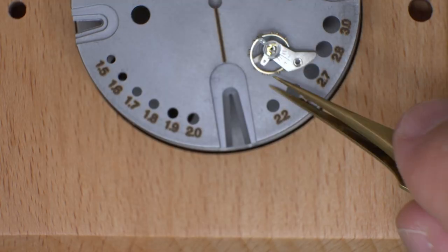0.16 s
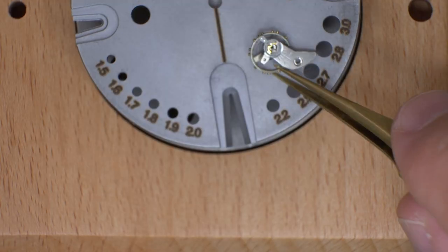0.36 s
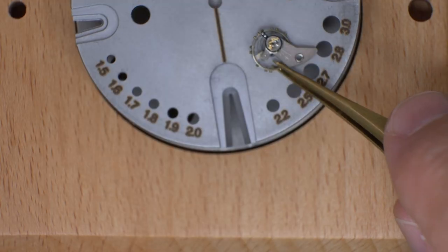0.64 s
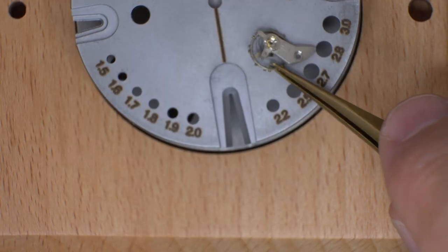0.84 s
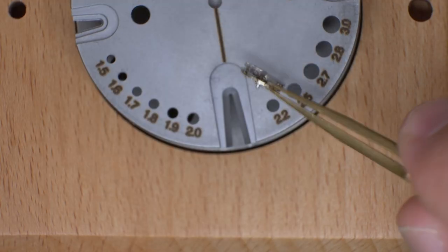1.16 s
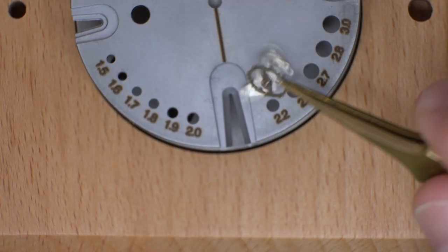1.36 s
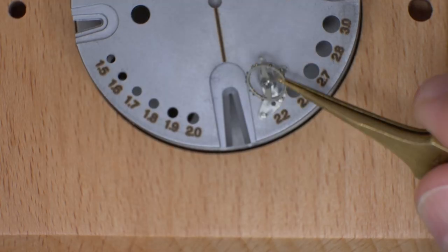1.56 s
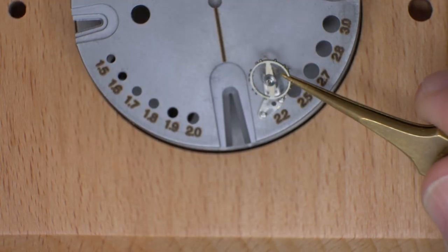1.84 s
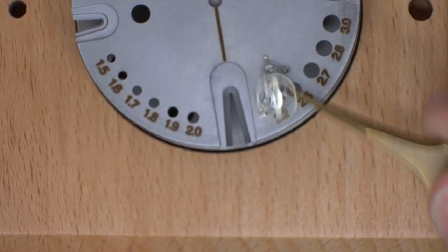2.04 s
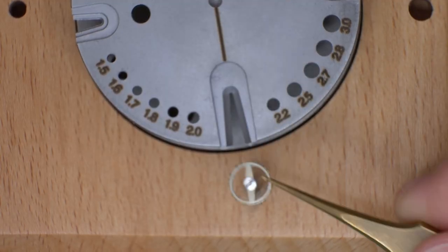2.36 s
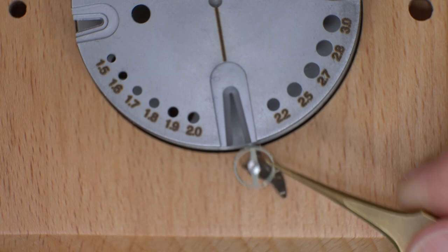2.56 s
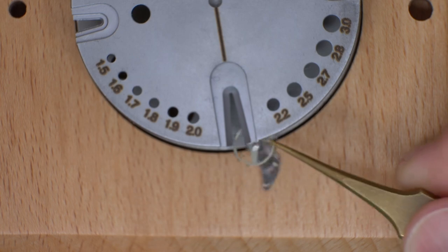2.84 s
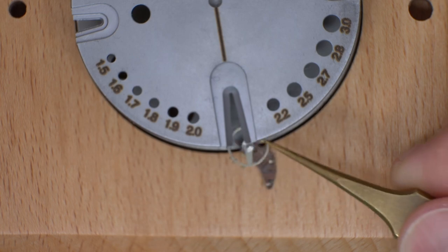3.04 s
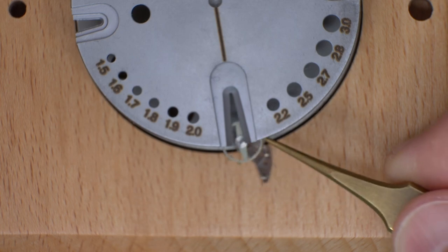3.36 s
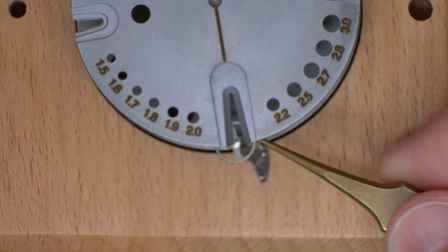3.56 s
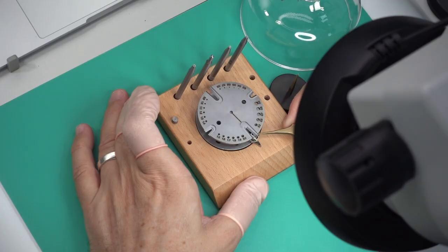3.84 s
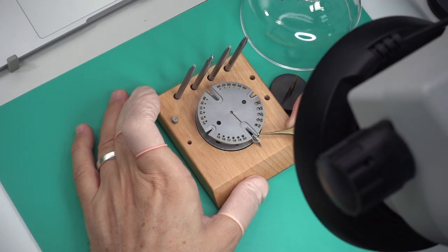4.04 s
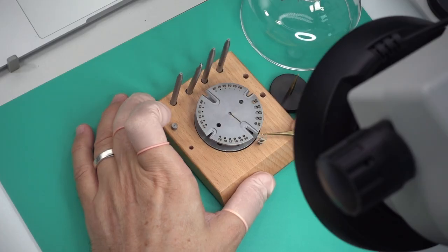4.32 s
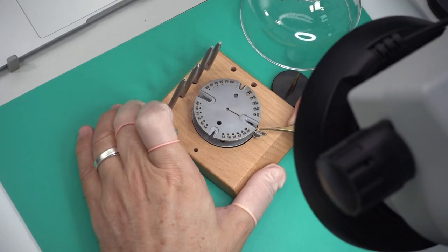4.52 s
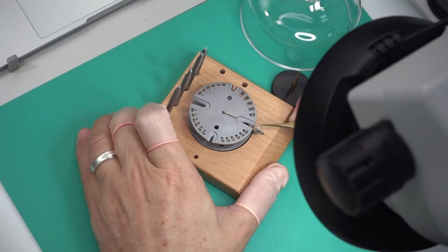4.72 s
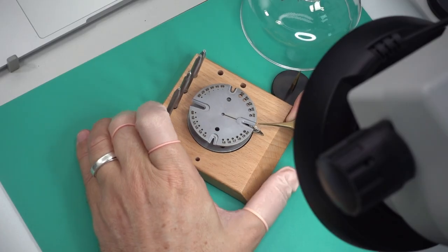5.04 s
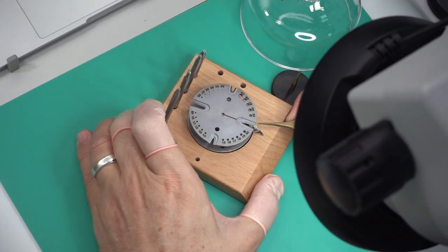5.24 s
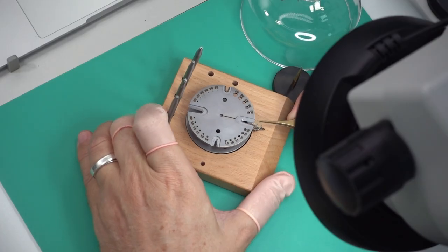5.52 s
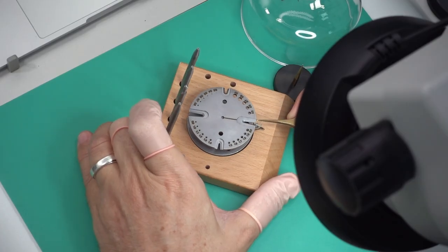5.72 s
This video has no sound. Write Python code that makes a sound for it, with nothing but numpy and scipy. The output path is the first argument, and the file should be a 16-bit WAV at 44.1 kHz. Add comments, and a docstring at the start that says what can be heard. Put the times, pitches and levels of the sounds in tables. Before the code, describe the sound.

Sparse, very fine metal chinks come first, then brighter clinks and a dense crackling run of ticks as tweezers drag a small part over steel. After a lull, a hand slides and turns a wooden block on a mat: soft scuffs, dull thumps, one broad crack, tiny loose-pin clicks and a closing knock. Steady low hum, soft hiss and faint high twitter; one close indoor microphone.

```python
"""Brass tweezers move a tiny watch part about on a steel plate, then a hand turns the wooden block under it on a mat.
Each contact is a sharp click with a little scatter; the blades, part, plate and block ring on at their own modes.
Dense tiny slips make the slides, scrapes and rattles; shaped noise makes a low rumble and soft pitched bumps.
Behind lie a quiet workroom's hum lines and hiss, and a faint high twitter of short blips, all at one microphone."""
import sys
import numpy as np
from scipy import signal
from scipy.fft import rfft, irfft
from scipy.io import wavfile
from scipy.ndimage import uniform_filter1d

SR = 44100
rng = np.random.default_rng(int(sys.argv[2]) if len(sys.argv) > 2 else 0)


def linear_from_db(decibels):
    """Turn decibels (scalar or array-like) into linear amplitude factors; 0 gives 1."""
    return 10 ** (np.asarray(decibels, float) / 20)


def to_wav(sig):
    """Store sig (one row per channel, or 1-D mono) as 16-bit WAV at the path in sys.argv[1].

    Samples outside -1..1 are clipped; the rate is SR.
    """
    pcm = np.clip(np.atleast_2d(sig), -1, 1) * 32767
    pcm = np.round(pcm).astype(np.int16)
    wavfile.write(sys.argv[1], SR, pcm.T)  # frames by channels


N = 259308

# What struck or rubbed steel sings. Each row: centre in Hz, width in Hz, relative level in dB.
STEEL_SONG = [(3160, 770, -5), (4400, 900, -4), (5300, 790, -2)]
# Loose pins in the block. One row: centre in Hz, width in Hz.
PIN_RESONANCE = (4280, 1450)
# The part struck and left chattering. Each row: start in seconds, seconds until damped,
# level of the low modes in dB, level of the top mode in dB.
PART_BLOWS = [(.237, 0.0028, -63.5, -90), (.274, .003, -73, -90), (1.283, .004, -66, -81),
              (1.405, 0.038, -79, -62), (1.44, .066, -77, -85), (1.506, 0.052, -65, -57),
              (1.554, 0.045, -65, -71), (1.617, 0.03, -67, -85), (2.213, .1, -70, -68),
              (2.372, .03, -84, -59), (2.402, .05, -81, -58)]


def evened(x):
    """Scales to rms 1."""
    return x / np.sqrt(np.mean(x ** 2) + 1e-20)


def peaked(x):
    """Scales so that the first 40 samples peak at 1."""
    return x / abs(x[:40]).max()


def read(points, hz):
    """Reads a spectrum on a log-frequency axis."""
    f, value = np.transpose(points)
    return np.interp(np.log(hz + 1), np.log(f + 1), value)


def add(mix, s, sound):
    """Adds a sound at time s, cut off where the mix ends."""
    stretch = mix[round(s * SR):][:len(sound)]
    stretch += sound[:len(stretch)]


def coloured(x, points):
    """Filters x by the spectrum in points, then scales to rms 1."""
    gain = linear_from_db(read(points, np.fft.rfftfreq(len(x), 1 / SR)))
    return evened(irfft(rfft(x) * gain, len(x)))


def resonate(x, hz, width_hz):
    """One two-pole resonance."""
    r = np.exp(-np.pi * width_hz / SR)
    return signal.lfilter([1, 0, -1], [1, -2 * r * np.cos(2 * np.pi * hz / SR), r * r], x)


def resonate_twice(x, hz, width_hz):
    """Two equal resonances in a row, with steeper skirts."""
    return resonate(resonate(x, hz, width_hz), hz, width_hz)


def slow(rate_hz):
    """Smooth chance of rms about 1 that changes about rate_hz times a second."""
    knots = rng.standard_normal(400)
    return np.interp(np.arange(N) / SR * rate_hz, np.arange(400), knots) * np.sqrt(1.5)


def room(air_db=-54.5):
    """Steady air noise, with narrow noise bands and sines of drifting pitch."""
    # Room air and microphone hiss. Each row: frequency in Hz, relative level in dB per Hz.
    air = [(12, -37), (25, -21.5), (63, -13.5), (110, -3.5), (250, -11.5), (420, -20.5), (470, -21),
           (1050, -26), (2000, -35), (4000, -41), (7600, -40), (8600, -37.5), (11000, -38), (16000, -36)]
    # Hum lines of the room, and narrow hiss around the twitter's pitches.
    # Each row: frequency in Hz, rms level in dB, width in Hz.
    lines = [(38.5, -68, 11), (59.5, -65, 1.4), (119.9, -53, 0.63), (198.2, -63, 12.4), (235.8, -67, 8.1),
             (369.2, -71, 19.7), (407.7, -74.5, 6), (548.5, -80, 3.9), (636, -85, 9.2), (940, -79, 1.516),
             (12400, -89.5, 2), (1770, -84.5, 27), (8570, -79.5, 190), (9170, -84.5, 400),
             (9250, -86.5, 350)]
    out = linear_from_db(air_db) * coloured(rng.standard_normal(N), air)
    t = np.arange(N) / SR
    for hz, db, width_hz in lines:
        if width_hz > 3:
            out += linear_from_db(db) * evened(resonate_twice(rng.standard_normal(N), hz, width_hz))
        else:
            drift = np.cumsum(width_hz * slow(rate_hz=3.956)) / SR  # in turns
            out += linear_from_db(db) * np.sqrt(2) * np.sin(2 * np.pi * (hz * t + drift + rng.random()))
    return out


def twitter(beat_s=1 / 50, blip_s=0.013, spread_db=4, clump_db=3, jitter_s=0.0045, wander_hz=110):
    """Short blips around three pitches on a loose steady beat, uneven in size and swelling in clumps."""
    # Each row: middle pitch in Hz, level in dB before the chance in size, first beat in seconds,
    # drop of every second blip in dB (negative makes it louder).
    pitches = [(8770, -70.5, 0.028, 3), (9150, -68, 0.042, 12), (9600, -70, .0293, -2.5)]
    out, t = np.zeros(N), np.arange(round(blip_s * SR)) / SR
    beats = np.arange(round(N / SR / beat_s))
    for hz, db, first_s, weak_db in pitches:
        clump = slow(rate_hz=4.6)
        for k, (late, size, pitch) in zip(beats, rng.standard_normal((len(beats), 3))):
            s = abs(first_s + k * beat_s + jitter_s * late)
            mood_db = clump_db * clump[min(round(s * SR), N - 1)]
            size_db = spread_db * min(size, 1)  # many small, none huge
            blip = np.hanning(len(t)) * np.sin(2 * np.pi * (hz + wander_hz * pitch) * t)
            add(out, s, linear_from_db(db - weak_db * (k % 2) + size_db + mood_db) * blip)
    return np.roll(out, -len(t) // 2)  # centres the blips on their times


def low_rumble():
    """Low rumble, uneven in level, in separate spells."""
    # Level of the rumble, spell by spell.
    # Each row of a spell: time in seconds, level in dB before a short smoothing.
    spells = [
        [(1.9, -61), (1.97, -75), (2.012, -51), (2.156, -48.5), (2.18, -58.5), (2.394, -54.5), (2.44, -51)],
        [(2.44, -69), (2.47, -51.5), (2.734, -52.5), (2.85, -57), (2.86, -78), (2.886, -55), (3.2, -58)],
        [(4.0, -72), (4.04, -57), (4.162, -57), (4.234, -41.5), (4.446, -61), (4.476, -77), (4.6, -51)],
        [(5.3, -73), (5.362, -61), (5.406, -64), (5.438, -49), (5.47, -73), (5.482, -57), (5.8, -56)],
    ]
    t, level_db = np.arange(N) / SR, np.full(N, -90.)
    for spell in spells:
        s, db = np.transpose(spell)
        inside = (t >= s[0]) & (t <= s[-1])
        level_db[inside] = np.interp(t[inside], s, db)
    spectrum = [(15, -52), (30, -1.5), (90, -0.5), (140, -12.0), (400, -25.5), (900, -99)]  # (Hz, dB)
    rumble = coloured(rng.standard_normal(N), spectrum)
    return linear_from_db(uniform_filter1d(level_db, 900)) * rumble


def hoots(width_hz=95):
    """Soft-edged puffs of noise in one resonance."""
    # Soft short bumps and rubs with a pitch. Each row: middle in seconds,
    # rms level in dB before the soft edges, pitch in Hz, length in seconds.
    bumps = [(2.79, -60, 477, 0.18), (3.84, -60.5, 472, .19), (4.245, -61, 2100, 0.086),
             (4.275, -59, 537, 0.077), (4.423, -59, 930, 0.072), (4.659, -56, 470, .15),
             (2.1, -67, 1750, .05), (4.37, -58, 1440, .012), (4.422, -63, 1544, .035),
             (4.497, -57, 1490, .014), (5.43, -60, 1400, 0.013), (5.431, -58, 927, 0.0156),
             (5.444, -58, 1390, .016), (5.466, -62, 1400, 0.023), (5.49, -60, 1400, .014)]
    out = np.zeros(N)
    for s, db, hz, length_s in bumps:
        size = round(length_s * SR)
        puff = resonate_twice(rng.standard_normal(12000), hz, width_hz)[-size:]
        add(out, s - length_s / 2, linear_from_db(db) * np.hanning(size) * evened(puff))
    return out


def slipping(slips_per_s, smooth=0.37):
    """Sparse random slips of uneven size and either sign, over a bed of smooth noise."""
    sizes = linear_from_db(4 * np.minimum(rng.exponential(1, N), 3.6))
    slips = sizes * (rng.random(N) < slips_per_s / SR)
    return slips * rng.choice([-1, 1], N) + smooth * rng.standard_normal(N)


def rubbing(slips_per_s=1800, mat_slips_per_s=500, rise=0.055, hold=0.56, fade_db=22):
    """Dense tiny slips under each stroke, heard through mat, steel or pins and as a wide rustle."""
    # Each stroke row: start in seconds, length in seconds, level in dB at its height,
    # level of the wide rustle in dB at its height.
    slides = [(.222, 0.16, -71, -87), (1.996, 0.047, -62.5, -65.5), (2.075, 0.066, -62, -66),
              (2.16, 0.18, -67, -75), (2.333, 0.21, -63.5, -72.5), (2.677, 0.14, -62, -71),
              (2.8, 0.13, -67.5, -86), (2.95, 0.058, -65, -64.5), (4.046, 0.18, -61.5, -66),
              (4.212, 0.084, -52, -54.5), (4.361, 0.079, -57.5, -66), (4.405, 0.084, -56.5, -65),
              (4.477, 0.065, -60, -63.5), (4.523, 0.1, -60, -64.5), (4.603, 0.21, -66.5, -66.5),
              (4.681, 0.04, -55.5, -60.5), (4.865, 0.066, -60.5, -65), (5.38, 0.06, -56, -62),
              (5.422, 0.042, -55.5, -73), (5.482, 0.037, -57.5, -68), (5.523, 0.091, -58, -70),
              (5.64, 0.1, -62, -69)]  # block and skin sliding on the mat
    scrapes = [(0.232, 0.19, -81, -87), (1.372, .15, -71, -85), (1.489, 0.16, -68.5, -72),
               (2.141, 0.078, -66, -63), (2.202, 0.11, -68, -61), (2.085, .05, -74, -76),
               (2.28, 0.072, -76, -69), (2.372, 0.089, -72, -72), (2.494, 0.036, -71, -65),
               (2.68, .11, -73, -76), (2.555, 0.14, -75, -74), (4.174, 0.029, -64, -58.5),
               (4.9, 0.14, -79, -82), (5.083, 0.13, -82, -68), (5.247, 0.081, -78, -72),
               (5.32, 0.14, -82, -69), (5.552, 0.072, -72, -59), (5.648, .09, -76, -75)]  # tips and pins scraping on steel
    rattles = [(4.9, 0.07, -72, -85), (5.0, .06, -83, -88), (5.09, .09, -74, -80), (5.192, 0.13, -75, -88),
               (5.343, .12, -76, -85), (5.533, 0.034, -69, -85), (5.66, 0.058, -69, -80)]  # pins shivering as the block turns
    # Colours of the mat and of the rustle. Each row: frequency in Hz, relative level in dB per Hz.
    mat_colour = [(150, -20), (350, 11), (900, -2), (1150, -5.5), (1400, -0.5), (1800, -4.5), (2300, -8.5),
                  (4000, -21.5), (9000, -48)]
    rustle_colour = [(600, -30), (1500, -2), (4000, -2), (7500, -3), (11000, -6), (16000, -10.5)]

    mat = coloured(slipping(mat_slips_per_s), mat_colour)
    steel_slips = slipping(slips_per_s)
    steel = evened(sum(linear_from_db(db) * evened(resonate(steel_slips, hz, width)) for hz, width, db in STEEL_SONG))
    pins = evened(resonate_twice(slipping(slips_per_s), *PIN_RESONANCE))
    rustle = coloured(slipping(slips_per_s), rustle_colour)

    power = np.zeros((4, N))
    for body, strokes in enumerate([slides, scrapes, rattles]):
        for s, length_s, db, rustle_db in strokes:
            u = np.arange(0, 2, 1 / (length_s * SR))  # time in stroke lengths
            stroke = np.clip(u / rise, 0, 1) * linear_from_db(-fade_db * np.maximum(u - hold, 0))
            add(power[body], s, (linear_from_db(db) * stroke) ** 2)
            add(power[3], s, (linear_from_db(rustle_db) * stroke) ** 2)
    return (np.sqrt(power) * [mat, steel, pins, rustle]).sum(0)


def strike(modes, db, tilt_db=0, push_s=0.0082, settle_s=0.00068):
    """A sharp blow and a rough push of a few milliseconds into decaying modes, tilted around 500 Hz."""
    t = np.arange(8000) / SR
    ring = np.zeros(8000)
    for k, (hz, mode_db, t60) in enumerate(modes):
        level_db = mode_db + tilt_db * np.log2(hz / 500) - 60 * t / t60
        ring += (-1) ** k * linear_from_db(level_db) * np.sin(2 * np.pi * hz * t)  # neighbours start in opposite sense
    push = .03 * rng.standard_normal(800) * np.exp(-t[:800] / push_s)
    push[0] = 1
    return linear_from_db(db) * signal.fftconvolve(ring * (1 - np.exp(-t / settle_s)), push)


def knocks():
    """Knocks ring the modes of the wooden block, each with its own brightness."""
    # Each row: frequency in Hz, level in dB before the brightness tilt, t60 in seconds.
    block_modes = [(122.3, -6, 0.22), (202, -6, 0.078), (283, -0.5, 0.066), (372, 0, 0.033),
                   (487, -7, 0.027), (630, -9, 0.036), (783, -9, 0.04), (1060, -17, 0.013),
                   (1775, -14, 0.021)]
    # Each row: start in seconds, gain in dB on the modes, brightness in dB per octave.
    blows = [(4.177, -46, 12), (4.179, -50, -3), (4.2104, -47.5, -2), (4.224, -40, 0.5), (4.236, -44.5, -2),
             (4.258, -48, 0), (4.366, -57, -1), (4.6885, -50, 3), (5.43, -52, -1), (5.5582, -32.5, 0),
             (5.564, -44.5, 1), (5.579, -46.5, 2)]
    out = np.zeros(N)
    for s, db, tilt_db in blows:
        add(out, s, strike(block_modes, db, tilt_db))
    return out


def clacks():
    """Blows ring the short modes of the steel plate."""
    # Each row: frequency in Hz, relative level in dB, t60 in seconds.
    plate_modes = [(2980, -3.5, 0.012), (4100, -4, 0.01), (5500, 2, 0.036), (6400, 0.5, 0.018),
                   (5500, -8, .02), (8900, 1, 0.015)]
    # Each row: start in seconds, gain in dB on the modes.
    blows = [(0.235, -67), (1.5074, -61), (1.5575, -59), (2.215, -49), (5.5605, -39.5)]
    out = np.zeros(N)
    for s, db in blows:
        add(out, s, strike(plate_modes, db))
    return out


def free_ring(hz, t60, free_s, db):
    """A decaying sine with a quick soft start, stopped within milliseconds after free_s."""
    t = np.arange(round((free_s + .01) * SR)) / SR
    grip = np.clip(t / 0.00057, 0, 1) * np.clip((free_s + 0.0075 - t) / 0.0045, 0, 1)
    return linear_from_db(db - 60 * t / t60) * grip * np.sin(2 * np.pi * (hz * t + rng.random()))


def part(chatter_per_s=500, chatter_db=-5, damped_s=.03):
    """The loose part keeps touching the plate, so low modes ring rough and broken; its top mode rings clean."""
    # Low modes of the part. Each row: frequency in Hz, relative level in dB, t60 in seconds.
    low_modes = [(4960, -0.5, 0.097), (5410, -1, 0.045), (5630, -7, 0.028)]
    # Its thin top mode. One row: frequency in Hz, t60 in seconds.
    top_mode = (13610, 0.091)
    out, t = np.zeros(N), np.arange(6000) / SR
    ring = sum(linear_from_db(db - 60 * t / t60) * np.sin(2 * np.pi * hz * t) for hz, db, t60 in low_modes)
    for s, free_s, db, top_db in PART_BLOWS:
        chance, size = rng.random((2, 6000))
        touches = linear_from_db(chatter_db) * (2 * size - 1) * (chance < chatter_per_s / SR) * (t < free_s)
        touches[0] = 1
        damping = linear_from_db(-60 * np.maximum(t - free_s, 0) / damped_s)
        add(out, s, linear_from_db(db) * damping * signal.fftconvolve(touches, ring)[:len(t)])
        add(out, s, free_ring(*top_mode, free_s, top_db))
    return out


def tweezer():
    """Free blades ring at two thin modes until a finger or the next contact stops them."""
    # Modes of the blades, lower then upper. Each row: frequency in Hz, t60 in seconds.
    blade_modes = [(6615, 0.23), (9917, 0.47)]
    # Blades set ringing. Each row: start in seconds, seconds until gripped or struck again,
    # level of the stronger mode in dB, lead of the upper mode over the lower in dB.
    blows = [(.9, .15, -72, 20), (1.282, .12, -62, 6), (1.405, 0.032, -68, -14), (1.44, 0.07, -64, -6),
             (1.506, 0.05, -58.5, -1), (1.562, 0.031, -59.5, -4), (1.604, .06, -64, 7),
             (2.184, 0.04, -54.5, 3), (2.165, .019, -64, 17), (2.213, 0.031, -52.5, -8),
             (2.259, 0.079, -61, -12), (2.2134, 0.14, -50, 12), (4.178, .049, -62, -17),
             (4.223, .16, -56.5, 15)]
    out = np.zeros(N)
    for s, free_s, db, lead_db in blows:
        for mode, lag_db in zip(blade_modes, (lead_db, -lead_db)):
            add(out, s, free_ring(*mode, free_s, db - max(lag_db, 0)))
    return out


def contact(hz, width_hz, body_db, edge_db, steel_db, scatter_db=-17, scatter_s=0.013):
    """A sharp contact, coloured by where it lands, then a few milliseconds of scatter from plate and bench."""
    t = np.arange(1500) / SR
    blow = linear_from_db(scatter_db - 60 * t / scatter_s) * rng.standard_normal(1500)
    blow[0] = 1
    wide = resonate(blow, hz, width_hz)
    body = peaked(resonate(wide, hz, width_hz)) + linear_from_db(-1) * peaked(wide)  # the wide one adds skirts
    edge = resonate(np.diff(blow, prepend=0), 8200, 6500)
    steel = sum(linear_from_db(db) * peaked(resonate(blow, mode_hz, mode_width_hz))
                for mode_hz, mode_width_hz, db in STEEL_SONG)
    return linear_from_db(body_db) * peaked(body) + linear_from_db(edge_db) * peaked(edge) + linear_from_db(steel_db) * peaked(steel)


def dry_tick(db, hz, edge_db):
    """A broad contact with steel singing 8 dB under it; a weaker treble edge makes it narrower."""
    width_hz = np.clip(4900 + 87 * (edge_db - db), 300, 0.99 * hz)  # 87 Hz per dB
    return contact(hz, width_hz, db, edge_db, db - 8)


def crackle(ticks_per_s=55, spread_db=3, dull_db=-10):
    """Spells of faint dry ticks at random times, levels and centres while things shift."""
    # Each row: start in seconds, length in seconds, typical level in dB, typical centre in Hz.
    spells = [(2.09, .12, -56, 2800), (2.14, .1, -54, 3500), (2.224, .13, -56, 4000),
              (2.299, .15, -55, 2580), (2.499, .25, -58, 3500), (2.75, 0.25, -56, 4800),
              (4.058, 0.072, -55, 3000), (4.46, 0.074, -54, 7200), (5, .12, -68, 4500),
              (5.173, .14, -68, 4300), (5.322, .2, -58, 4000), (5.62, .1, -59, 4550)]
    out = np.zeros(N)
    for s, length_s, db, hz in spells:
        for _ in range(int(np.ceil(ticks_per_s * length_s))):
            size, place = rng.standard_normal(2)
            tick_db = db + spread_db * size
            tick = dry_tick(tick_db, hz * 1.4 ** place, tick_db + dull_db)
            add(out, s + rng.random() * length_s, tick)
    return out


def pin_ticks():
    """Pins click in their holes at the pin resonance, with little singing steel."""
    # Each row: start in seconds, peak level in dB, peak level of the treble edge in dB.
    clicks = [(4.8997, -46, -60), (4.965, -50.5, -56), (5.01, -57, -70), (5.033, -58, -70),
              (5.0816, -57, -70), (5.2073, -59, -70), (5.2552, -58, -70), (5.322, -48, -42),
              (5.329, -55, -64), (5.336, -49, -56), (5.348, -51, -43), (5.3587, -52, -63),
              (5.377, -56, -66), (5.4855, -46.5, -43), (5.497, -51, -44), (5.5244, -47, -55)]
    out = np.zeros(N)
    for s, db, edge_db in clicks:
        add(out, s, contact(*PIN_RESONANCE, db, edge_db, db - 16))
    return out


def crack():
    """One hard broad crack, a contact with weaker scatter."""
    # Each row: start in seconds, peak level in dB, centre in Hz, width in Hz,
    # peak level of the treble edge in dB.
    blows = [(4.6891, -26.5, 1890, 6440, -30)]
    out = np.zeros(N)
    for s, db, hz, width_hz, edge_db in blows:
        add(out, s, contact(hz, width_hz, db, edge_db, db - 16, scatter_db=-19))
    return out


def chinks(width_hz=1260, edge_db=-11):
    """Ringing contacts, mostly with steel singing above the contact; they scatter longer than dry ticks."""
    # Each row: start in seconds, level of the singing steel in dB, centre of the contact in Hz,
    # peak level of the contact in dB.
    ringing_contacts = [(0.236, -53, 3140, -55), (0.2745, -59, 5100, -65), (0.3143, -62, 3000, -56),
                        (0.8094, -61, 3000, -60), (1.2832, -49, 3200, -54), (1.507, -46, 3180, -50),
                        (1.531, -58, 3000, -60), (1.556, -45, 3180, -51), (1.613, -52, 3100, -55),
                        (1.637, -60, 3200, -62), (2.1574, -54, 4490, -59), (2.1846, -40.5, 2800, -54),
                        (2.215, -39, 3100, -46), (4.178, -40, 2880, -48)]
    out = np.zeros(N)
    for s, steel_db, hz, body_db in ringing_contacts:
        chink = contact(hz, width_hz, body_db, steel_db + edge_db, steel_db, scatter_db=-18.5, scatter_s=0.017)
        add(out, s, chink)
    return out


def ticks():
    """Single dry contacts of tips, part and block."""
    # Each row: start in seconds, peak level in dB, centre in Hz, peak level of the treble edge in dB.
    contacts = [(0.8094, -51, 12400, -48), (.974, -54, 6000, -62), (1.18, -63, 5000, -64),
                (1.509, -46, 2200, -66), (1.558, -55, 2200, -68), (2.01, -46, 1500, -60),
                (2.011, -54, 5000, -54), (2.02, -53, 4500, -58), (2.0807, -44.5, 1990, -55),
                (2.085, -49, 2600, -62), (2.097, -54, 1750, -68), (2.1332, -50, 4260, -63),
                (2.168, -51, 3000, -66), (2.208, -50, 2500, -60), (2.212, -56, 12500, -34),
                (2.2165, -48, 2200, -44), (2.239, -54, 4000, -56), (2.254, -48, 4500, -56),
                (2.258, -33, 6660, -47), (2.259, -44, 3100, -60), (2.268, -33, 6600, -47),
                (2.274, -46, 4600, -60), (2.2957, -46, 4520, -62), (2.338, -47, 4200, -50),
                (2.354, -55, 3500, -60), (2.372, -34.5, 6200, -43), (2.374, -46, 2700, -60),
                (2.3798, -46, 4000, -48), (2.387, -45, 4100, -58), (2.4026, -44, 4900, -53),
                (2.418, -44, 2010, -62), (2.4265, -38.5, 5830, -48), (2.497, -46, 4200, -60),
                (2.5, -39.5, 7360, -51), (2.512, -46, 7000, -56), (2.516, -49, 4200, -62),
                (2.537, -51, 7000, -62), (2.546, -47.5, 5000, -54), (2.5681, -44, 7060, -56),
                (2.576, -51, 6500, -58), (2.632, -53, 4500, -62), (2.645, -56, 4500, -64),
                (2.593, -45, 6560, -52), (2.608, -48.5, 4300, -53), (2.619, -47, 6400, -52),
                (2.6568, -46, 4400, -52), (2.686, -48.5, 4500, -61), (2.689, -49, 5540, -55),
                (2.7028, -45, 4000, -48), (2.7167, -48, 4500, -62), (2.723, -48, 7100, -49),
                (2.7323, -46, 4400, -63), (2.7426, -50, 4400, -62), (2.7546, -49, 7100, -60),
                (2.779, -49.5, 4300, -64), (2.871, -48.5, 3900, -53), (2.9557, -47, 4200, -47),
                (2.9822, -50, 4940, -55), (4.0545, -46, 2190, -45), (4.073, -42, 5250, -52),
                (4.0976, -49, 2200, -63), (4.1074, -49, 5200, -63), (4.114, -49, 2100, -50),
                (4.09, -50, 5000, -55), (4.1254, -47, 5200, -60), (4.209, -45, 3500, -50),
                (4.219, -52, 3000, -52), (4.223, -34, 7150, -35), (4.228, -44, 3500, -48),
                (4.255, -47, 5500, -52), (4.2618, -39, 4400, -47), (4.285, -42, 5600, -55),
                (4.3667, -50, 2900, -48), (4.3932, -46, 5300, -43), (4.431, -41.5, 4400, -70),
                (4.475, -50, 6500, -55), (4.4965, -46, 1440, -62), (4.499, -44.5, 4970, -35.5),
                (4.526, -50, 6500, -56), (4.8705, -43.5, 3270, -48), (4.8811, -51, 3400, -50),
                (5.049, -49, 5000, -62), (5.099, -51, 6500, -60), (5.1168, -42, 6140, -40),
                (5.487, -52, 2000, -60), (5.506, -47, 1500, -66), (5.5585, -38, 3000, -52),
                (5.5615, -35.5, 3750, -43), (5.565, -36, 5550, -55)]
    out = np.zeros(N)
    for s, db, hz, edge_db in contacts:
        add(out, s, dry_tick(db, hz, edge_db))
    return out


def scene():
    """Everything reaches one microphone."""
    background = room() + twitter() + low_rumble() + hoots()
    block_and_plate = rubbing() + knocks() + clacks()
    tips_and_part = part() + tweezer() + crackle() + pin_ticks() + crack() + chinks() + ticks()
    mono = background + block_and_plate + tips_and_part
    return np.array([mono, mono])


def band_limit(x):
    """A steep low-pass at the top of the band."""
    return signal.sosfilt(signal.butter(12, 16460, fs=SR, output="sos"), x)


def record(dry, edge_hz=15900):
    """Two nearly equal channels, with a faint random side noise that follows the sound, and the band limit."""
    # Side noise, relative to the sound. Each row: frequency in Hz, level in dB.
    side_colour = [(60, -30.5), (180, -47.5), (550, -29.5), (1650, -39), (4970, -32.5), (15000, -37.5)]
    hz = np.fft.rfftfreq(512, 1 / SR)
    taps = irfft(linear_from_db(read(side_colour, hz)) * np.exp(2j * np.pi * rng.random(len(hz))))  # random phases
    side = signal.oaconvolve(dry[0], taps, "same")
    band = signal.firwin(255, edge_hz, window=("kaiser", 5), fs=SR)
    pair = signal.oaconvolve(dry + np.outer([1, -1], side), band[None], "same")
    return band_limit(pair)


dry = scene()
out = record(dry)
to_wav(out)
```